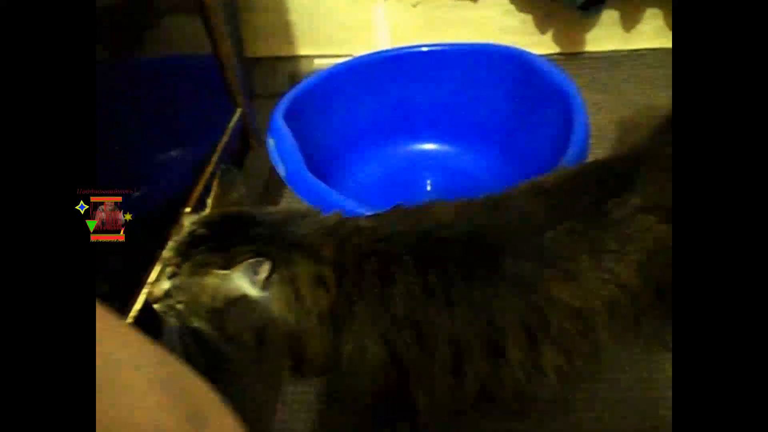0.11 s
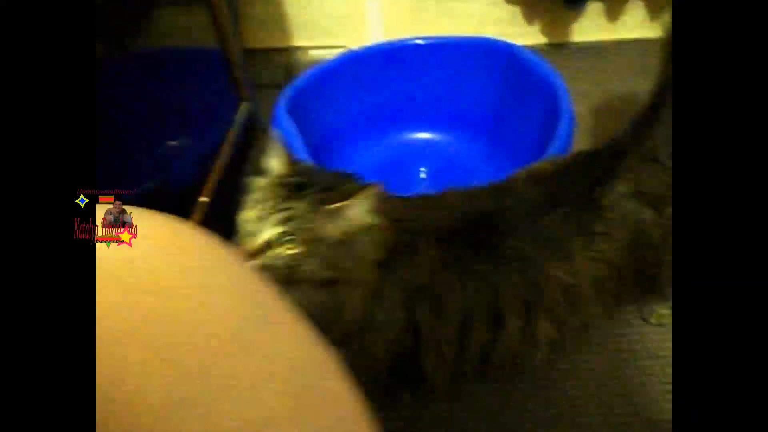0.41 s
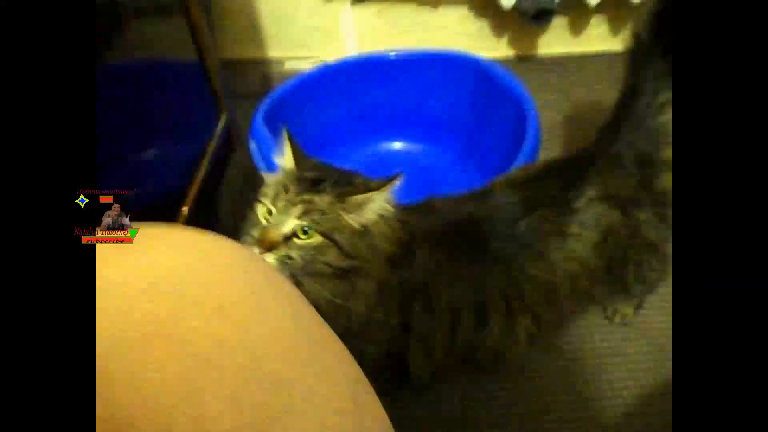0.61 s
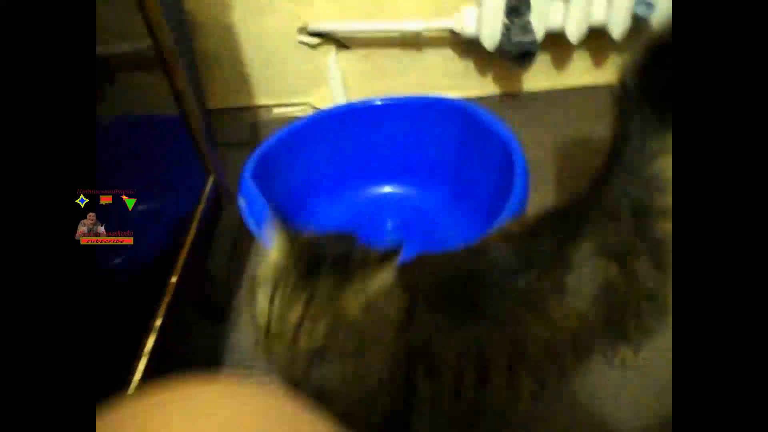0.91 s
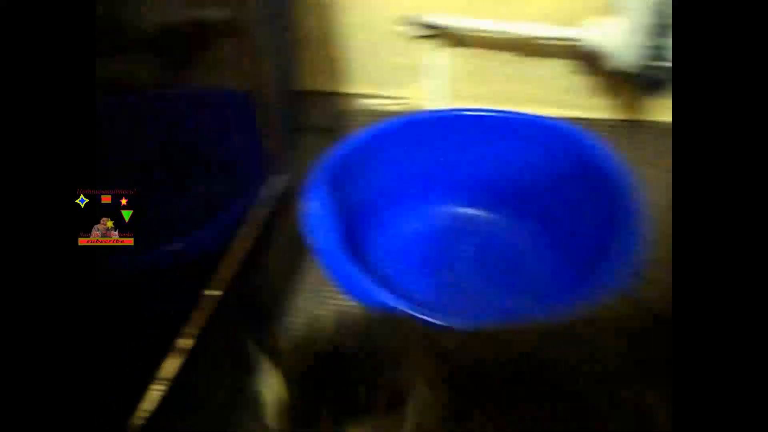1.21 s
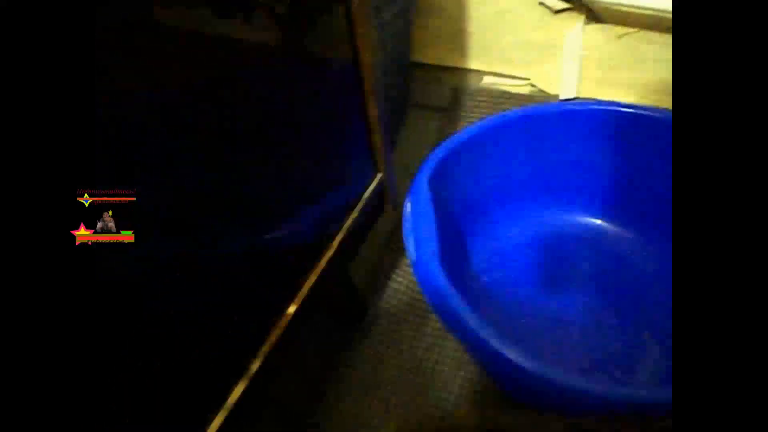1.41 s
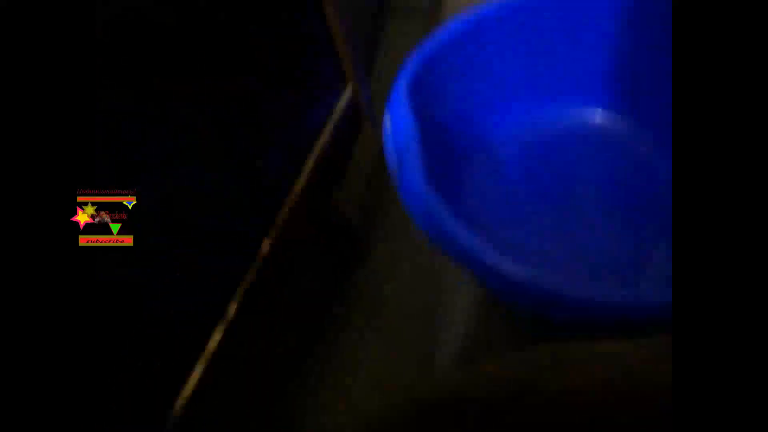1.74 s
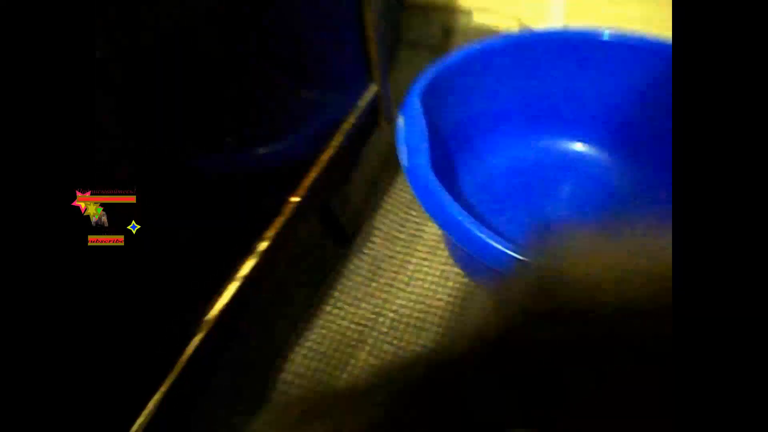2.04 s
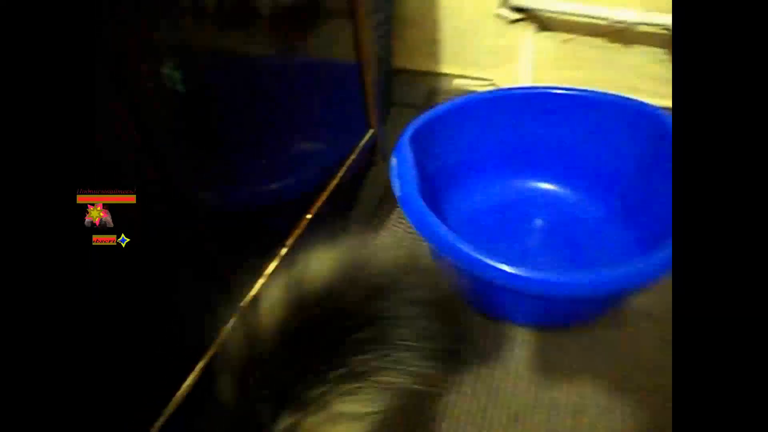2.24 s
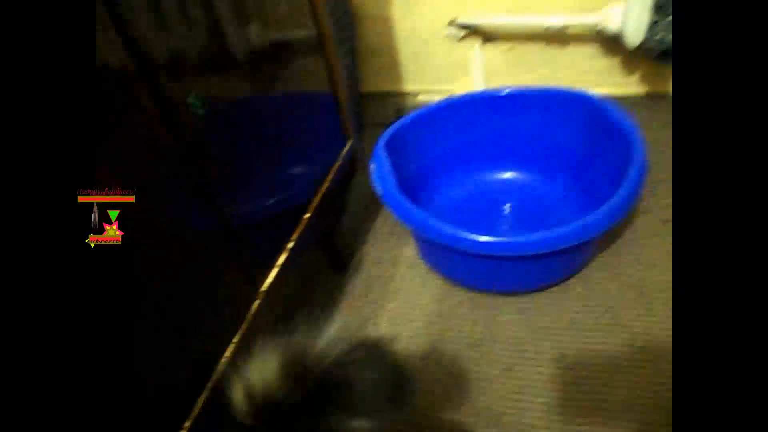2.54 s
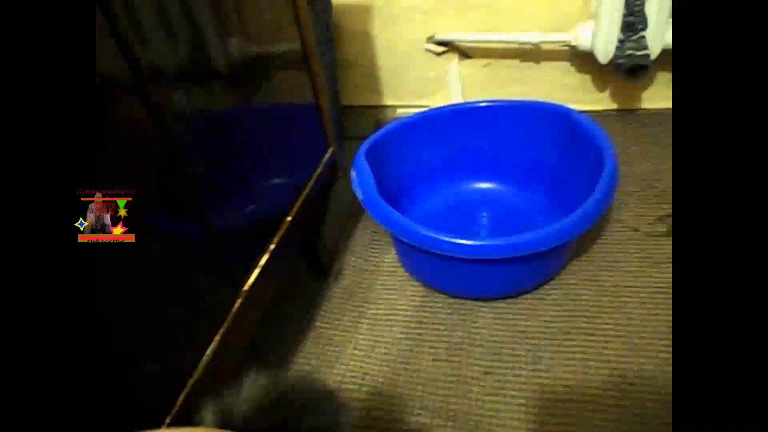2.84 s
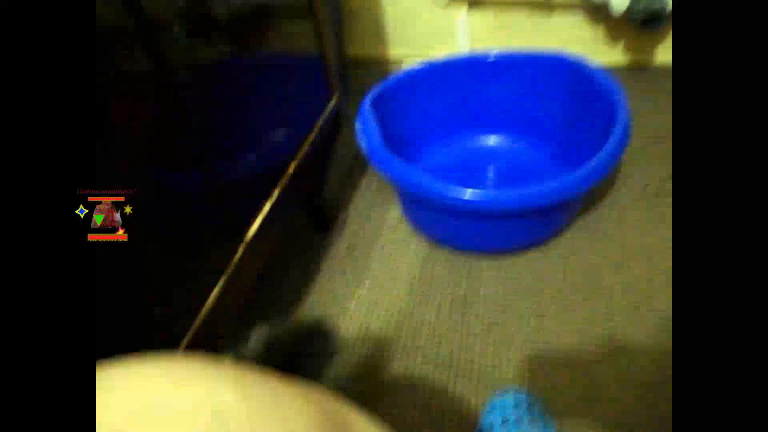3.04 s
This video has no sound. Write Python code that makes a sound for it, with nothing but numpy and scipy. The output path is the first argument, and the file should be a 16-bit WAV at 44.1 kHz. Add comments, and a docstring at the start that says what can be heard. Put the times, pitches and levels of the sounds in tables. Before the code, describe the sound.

Slippers scuff on carpet in a small quiet room; close plastic clicks and a creak come early, then dragging steps, a sharp slap around two seconds and a juddering drag, with handheld microphone rumble.

```python
"""Slippers on carpet, with a hand-held camera

Someone shuffles over carpet in a small room: friction noise from many fibre flicks makes the scuffs,
decaying noise and resonances the slaps, low modes the thuds, and stick-slip the groans and a judder.
Close to the microphone a plastic camera case creaks and clicks in decaying modes, and squeaks in
narrow resonances. Slow rumble from the hand, quiet room noise and a thin whine lie beneath.
"""
import sys
import numpy as np
from scipy import signal
from scipy.fft import rfft, irfft
from scipy.io import wavfile
from scipy.ndimage import uniform_filter1d

SR = 44100
rng = np.random.default_rng(int(sys.argv[2]) if len(sys.argv) > 2 else 0)


def transcribe(signal):
    """Save signal, clipped to [-1, 1], as a 16-bit WAV file at the path in sys.argv[1]."""
    frames = np.atleast_2d(signal).T
    limited = np.clip(frames, -1, 1)
    pcm = np.round(limited * 32767).astype(np.int16)
    wavfile.write(sys.argv[1], SR, pcm)


N = 141120
T = np.arange(N) / SR

# spectrum of bright friction, treble: frequency_hz, level_db
HISS_COLOUR = [(2500, -18), (4300, -12.5), (5000, -3.5), (6200, -0.5), (7100, 2.5), (7900, -2),
               (9000, -5.5), (10200, -6.5), (11500, -30.5)]
# spectrum of coarse friction, upper middle: frequency_hz, level_db
RASP_COLOUR = [(1200, -18), (1800, -1.5), (2150, -0.5), (2500, -2), (2900, 0), (3500, -1), (4100, -2.5),
               (4600, -4), (6000, -10)]
# spectrum of the fuller friction, lower middle: frequency_hz, level_db
BODY_COLOUR = [(250, 5), (400, -5), (560, 0.5), (900, -2), (1180, -1), (1500, -9), (2200, -14)]


def from_db(db):
    """Decibels are logarithmic: 20 dB is a factor of ten in amplitude."""
    return 10 ** (np.asarray(db) / 20)


def rms_one(x):
    """Root-mean-square normalisation: scale to unit rms."""
    return x / np.sqrt(np.mean(x ** 2) + 1e-20)


def level(rows):
    """Amplitude envelope: gain over time from (time_s, level_db) points, silent outside them."""
    return from_db(np.interp(T, *np.transpose(rows), left=-np.inf, right=-np.inf))


def coloured(x, points):
    """Spectral shaping through (frequency_hz, level_db) points, with falling skirts; rms 1."""
    hz, db = np.transpose(points)
    f = np.maximum(np.fft.rfftfreq(N, 1 / SR), 1)
    skirts = np.minimum(f / hz[0], 1) ** 2 * np.minimum(hz[-1] / f, 1) ** 2
    colour = from_db(np.interp(np.log(f), np.log(hz), db))
    return rms_one(irfft(rfft(x) * skirts * colour, N))


def noise(points):
    """Coloured noise: Gaussian noise with a chosen spectrum."""
    return coloured(rng.standard_normal(N), points)


def slow_noise(cutoff_hz):
    """Low-pass noise: a random wander slower than the cutoff; rms 1."""
    low_pass = signal.butter(2, cutoff_hz, fs=SR, output="sos")
    return rms_one(signal.sosfilt(low_pass, rng.standard_normal(N)))


def steadied(x, span_s):
    """Amplitude levelling: divide by the running rms to even out the chance swells of a noise."""
    running_power = uniform_filter1d(x ** 2, max(int(span_s * SR), 2))
    return x / np.sqrt(running_power + 0.0011)


def blow(start, rise, decay):
    """Impact envelope: a quick linear rise and an exponential fall."""
    age = np.maximum(T - start, 0)
    fall = np.exp(-np.minimum(np.maximum(age - rise, 0) / decay, 50))
    return np.minimum(age / rise, 1) * fall


def ring(age, hz, t60):
    """Damped free vibration: a struck mode falls 60 dB in t60 seconds."""
    return np.sin(2 * np.pi * hz * age) * np.exp(-np.log(1000) * age / t60)


def resonant(rings):
    """Forced resonance: noise excites narrow (centre_hz, width_hz, level_db) resonances."""
    rub = rng.standard_normal(N)
    tones = 0
    for hz, width, db in rings:
        peak = signal.iirpeak(hz, hz / width, fs=SR)
        tones = tones + from_db(db) * rms_one(signal.lfilter(*peak, rub))
    return steadied(rms_one(tones), 0.06)


def background():
    """Stationary sound: coloured room noise and the pure tones of the camera's electronics."""
    # quiet room noise: frequency_hz, level_db
    floor_colour = [(40, 0.5), (100, -0.5), (200, -5), (400, -6), (1000, -15), (2000, -17.5), (4000, -18),
                    (7200, -16), (10300, -23.5), (11500, -30)]
    # thin electronic whine: frequency_hz, level_db
    whine_tones = [(10714, -72), (10796, -83), (11254, -84), (11336, -96.5)]
    floor_db = -55
    whine = sum(from_db(db) * rms_one(np.sin(2 * np.pi * hz * T)) for hz, db in whine_tones)
    return from_db(floor_db) * noise(floor_colour) + whine


def handling():
    """Low-frequency motion: rumble as the camera sways, and bumps as damped slow swings."""
    # the camera sways in the hand: time_s, level_db
    sway_level = [(0, -52), (.25, -44), (.5, -48.5), (.85, -47), (1.02, -51), (1.13, -36.5), (1.3, -38.5),
                  (1.5, -32), (1.8, -39), (1.94, -44.5), (2.04, -45.5), (2.12, -31), (2.22, -44),
                  (2.65, -55), (2.9, -44.5), (3.2, -46)]
    # spectrum of the rumble: frequency_hz, level_db
    rumble_colour = [(10, 1), (18, -3), (30, -9), (50, -14), (80, -22.5), (160, -37)]
    # the hand bumps the camera: start_s, level_db, pitch_hz, decay_s
    bump_rows = [(.303, -21.5, 28.2, 0.014), (0.392, -25.5, 23.5, 0.048), (.596, -30.5, 36, 0.036)]
    bumps = 0
    for start, db, hz, decay in bump_rows:
        swing = np.sin(2 * np.pi * hz * (T - start))
        bumps = bumps + from_db(db) * blow(start, 0.0028, decay) * swing
    sway = from_db(np.interp(T, *np.transpose(sway_level)))
    return bumps + sway * steadied(noise(rumble_colour), 0.073)


def squeak():
    """Frictional excitation: a finger rubs narrow resonances, and the pitch sags as the rub slows."""
    # loudness of the rub: time_s, level_db
    squeak_level = [(1.026, -83), (1.05, -38), (1.072, -39), (1.083, -45.5), (1.145, -43), (1.17, -55.5),
                    (1.195, -48), (1.215, -72)]
    # resonances at the middle of the rub: centre_hz, width_hz, level_db
    squeak_rings = [(1199, 28, -5), (1007, 20, -8), (1420, 230, -15)]
    fall_per_s = 0.24  # share of the middle pitch lost each second
    middle = (squeak_level[0][0] + squeak_level[-1][0]) / 2
    # reading the tone along a slowing clock lowers its pitch
    sagging = T - fall_per_s * (T - middle) ** 2 / 2
    tone = np.interp(sagging, T, resonant(squeak_rings))
    return level(squeak_level) * steadied(tone, 0.0113)


def snap(start, rings, t60, case_db, cut_hz):
    """Impulsive release: a slip cracks, rings its own part (pitch_hz, level_db) and the case modes."""
    # modes of the case, before a small random spread in level: pitch_hz, level_db, t60_s
    case_modes = [(947, -12.5, 0.031), (1190, -17.5, 0.022), (2000, -19, .012), (2690, -3, 0.0097),
                  (3720, -33, 0.0045), (4780, -2, 0.0042), (5650, -2, .007), (7100, -8, 0.0077),
                  (7820, -12.5, 0.013), (9840, -9, 0.0029), (10200, -40, 0.014)]
    ring_db, crack_db, crack_decay_s = 1, -4, 0.00067
    age = np.arange(SR // 20) / SR
    case = 0
    for k, (hz, db, mode_t60) in enumerate(case_modes):
        gain = (-1) ** k * from_db(db + rng.normal(0, 1))
        case = case + gain * ring(age, hz, mode_t60)
    crack = from_db(crack_db) * rng.standard_normal(len(age)) * np.exp(-age / crack_decay_s)
    high_pass = signal.butter(1, min(cut_hz, SR / 3), "high", fs=SR, output="sos")
    shell = signal.sosfilt(high_pass, case + crack)
    part = sum(from_db(ring_db + db) * ring(age, hz, t60) for hz, db in rings)
    out = np.zeros(N)
    first = int(start * SR)
    out[first:first + len(age)] = from_db(case_db) * shell + part
    return out


def camera_case():
    """Stick-slip and modal ringing: the grip makes the case creak, ending in a knock, then click."""
    # quick run of slips in the creak: start_s, level_db
    creak_slips = [(.2952, -26.5), (.2967, -18), (.2984, -16), (.3001, -9)]
    # single clicks: start_s, level_db, ring_hz, ring_t60_s, second_ring_hz, second_ring_db (relative),
    # case_db (relative), low_cut_hz
    click_rows = [(0.5035, -8.5, 2710, 0.01, 5190, -15, -4, 600),
                  (0.557, -18.5, 7800, 0.0059, 9900, 1, -4.5, 4000),
                  (.5963, -10.5, 4970, 0.008, 2850, -13, -9, 1980),
                  (0.6141, -15.5, 7100, 0.007, 3400, -5.5, 0, 3000),
                  (1.1106, -22, 6670, 0.0066, 7400, -2.5, -7, 6140)]
    creak_hz, creak_t60_s, creak_case_db = 3570, 0.0088, -1
    knock_db, knock_hz, knock_t60_s = -28, 637, 0.045
    creak = 0
    for start, db in creak_slips:
        slip = snap(start, [(creak_hz, 0)], creak_t60_s, creak_case_db, cut_hz=890)
        creak = creak + from_db(db) * slip
    knock_age = np.maximum(T - creak_slips[-1][0], 0)
    knock = from_db(knock_db) * ring(knock_age, knock_hz, knock_t60_s)
    clicks = 0
    for start, db, hz, t60, second_hz, second_db, case_db, cut_hz in click_rows:
        click = snap(start, [(hz, 0), (second_hz, second_db)], t60, case_db, cut_hz)
        clicks = clicks + from_db(db) * click
    return creak + knock + clicks


def drag_and_chirp():
    """Forced resonance: the drag rings in narrow bands; once the sole squeaks with falling pitch."""
    # faint rough squeak of the sole: time_s, level_db, pitch_hz
    chirp_path = [(2.125, -64, 3140), (2.137, -56, 3000), (2.158, -50, 2590), (2.172, -50, 2160),
                  (2.185, -54, 1950), (2.20, -66, 1920)]
    # loudness of the ringing during the drag: time_s, level_db
    drag_level = [(2.43, -76), (2.443, -44), (2.48, -42.5), (2.56, -44.5), (2.66, -51), (2.70, -47),
                  (2.78, -49), (2.915, -49), (2.935, -61)]
    # low resonances, and a bright one of the microphone opening near 7 kHz (two rows):
    # centre_hz, width_hz, level_db
    drag_rings = [(307, 37, -3), (572, 13, -4), (1200, 63, -2.5), (6920, 260, -3), (7100, 240, -1.5)]
    time_s, db, hz = np.transpose(chirp_path)
    carrier = np.sin(2 * np.pi * np.cumsum(np.interp(T, time_s, hz)) / SR)
    chirp = rms_one(slow_noise(120) * carrier)  # random amplitude roughens the tone
    return level(drag_level) * resonant(drag_rings) + level(np.c_[time_s, db]) * chirp


def groans(count=4):
    """Stick-slip oscillation: short, unsteady harmonic tones that sink as the foot slows."""
    # a sole grips and slides: start_s, length_s, level_db, first_pitch_hz, last_pitch_hz
    groan_rows = [(.665, 0.076, -45, 240, 164), (1.362, 0.12, -34.5, 112, 102),
                  (2.455, 0.123, -36, 178, 127.2)]
    jitter, jitter_hz = 0.049, 50  # rms share of the pitch; cutoff of its wander
    step_db = -10.5  # from each harmonic to the next
    out = np.zeros(N)
    for start, length, db, first_hz, last_hz in groan_rows:
        along = np.clip((T - start) / length, 0, 1)
        glide_hz = first_hz + (last_hz - first_hz) * along
        phase = 2 * np.pi * np.cumsum(glide_hz * (1 + jitter * slow_noise(jitter_hz))) / SR
        tone = sum(from_db(db + step_db * k) * np.sin((k + 1) * phase) for k in range(count))
        out += np.sin(np.pi * along) * tone
    return out


def thuds():
    """Low-mode impact: weight makes the floor boom under the carpet, one mode in a dull puff."""
    # weight comes down: start_s, level_db, pitch_hz, decay_s, boom_db (relative to the puff)
    thud_rows = [(.851, -31.5, 199, 0.022, -8), (1.365, -37.5, 106.7, .03, 2.5),
                 (1.396, -37.5, 108, 0.058, 6), (1.444, -34.5, 230, 0.028, -3.5),
                 (1.51, -37, 101, 0.026, 8), (1.602, -45.5, 108.5, 0.025, 7.5),
                 (1.664, -39.5, 106, 0.029, 7), (1.738, -44.5, 97, 0.027, 7.5),
                 (1.795, -41.5, 84.7, .04, 8), (2.052, -30, 103.7, 0.027, -5), (2.277, -37, 90, 0.017, 4)]
    # spectrum of the puff: multiple of the pitch (no unit), level_db
    thud_colour = [(.3, 9), (.7, 0), (1.2, 1.5), (2, -4.5), (4, -14), (9, -24.5)]
    rise_s = 0.013
    out = np.zeros(N)
    for start, db, hz, decay, boom_db in thud_rows:
        puff = steadied(noise([(hz * k, colour_db) for k, colour_db in thud_colour]), 0.0167)
        boom = from_db(boom_db) * np.sin(2 * np.pi * hz * (T - start))
        out += from_db(db) * blow(start, rise_s, decay) * (puff + boom)
    return out


def judder(count=7):
    """Periodic stick-slip: the drag ends in regular slips, each with a bright catch; the last is late."""
    start_s, period_s, last_late_s, catch_delay_s = 2.7615, .0226, .006, .0062
    slip_db, catch_db, rasp_db = -36.5, -36, -44
    slip_decay_s, catch_decay_s = 0.0044, 0.0026
    starts = start_s + period_s * np.arange(count)
    starts[-1] += last_late_s
    slips = sum(blow(s, 0.00033, slip_decay_s) for s in starts)
    catches = sum(blow(s + catch_delay_s, 0.001, catch_decay_s) for s in starts)
    slip_sound = from_db(slip_db) * slips * steadied(noise(BODY_COLOUR), 0.0063)
    catch_sound = from_db(catch_db) * catches * noise(HISS_COLOUR)
    rasp_sound = from_db(rasp_db) * (slips + catches) * noise(RASP_COLOUR)
    return slip_sound + catch_sound + rasp_sound


def slaps():
    """Broadband impact: short bright smacks of noise and resonance, with a tail from the room."""
    # slipper slaps and taps: start_s, level_db, decay_s, body_db (relative), rasp_db (relative)
    slap_rows = [(0.01, -48.5, .003, -3, -2), (.036, -40, 0.0064, -9, -1), (0.041, -41, 0.0044, -4, -10),
                 (0.209, -36.5, 0.011, 1.5, -9), (0.391, -45, 0.0036, 7.5, 12.5),
                 (.605, -35.5, 0.0055, -11, -3.5), (1.342, -39.5, 0.0072, 2.5, -3),
                 (1.363, -57.5, 0.0073, 17, 0), (1.4421, -31.5, 0.0043, 0, -4),
                 (2.052, -17.5, 0.005, -14, -5), (2.273, -41.5, 0.018, 0, -1.5)]
    # resonances that form the rasp: centre_hz, width_hz, level_db
    slap_rings = [(1380, 73, -12), (1950, 380, 2.5), (2850, 250, 6.5), (3400, 390, -1), (3880, 50, -5),
                  (4780, 120, -10)]
    # spectrum of the hiss: frequency_hz, level_db
    slap_colour = [(2500, -25), (4300, -1.5), (5600, -3.5), (6400, 1), (7300, 1.5), (8100, -3.5),
                   (9000, -3.5), (10000, -3), (11500, -31.5)]
    attack_s, tail_db, tail_decay_s = 0.0012, -22.5, 0.031
    hiss = noise(slap_colour)
    body = steadied(noise(BODY_COLOUR), 0.0077)
    rasp = steadied(resonant(slap_rings), 0.015)
    out = np.zeros(N)
    for start, db, decay, body_db, rasp_db in slap_rows:
        tail = from_db(tail_db) * blow(start, 0.0022, tail_decay_s)
        shape = np.hypot(blow(start, attack_s, decay), tail)  # powers add
        out += from_db(db) * shape * (hiss + from_db(body_db) * body + from_db(rasp_db) * rasp)
    return out


def friction(colour):
    """Shot noise: countless fibres flick free at random, with uneven strength."""
    fibres_per_s, spread_db = 9000, 3
    flicks = (rng.random(N) < fibres_per_s / SR) * rng.choice([-1, 1], N)
    strength = from_db(spread_db * np.minimum(rng.exponential(1, N), 5))
    return coloured(flicks * strength, colour)


def scuffs():
    """Modulated friction: strokes swell, fade and let go; an irregular flutter roughens the loudness."""
    # a sole or cloth brushes along: start_s, length_s, swell_s, fade_db,
    # hiss_db, body_db, bass_db, rasp_db
    scuff_rows = [(0.237, 0.32, 0.038, 6, -58.5, -53.5, -57, -57.5),
                  (0.576, 0.081, .015, 4.5, -44, -42.5, -49, -50),
                  (0.66, 0.043, 0.035, 0, -47.5, -57, -43, -55.5),
                  (0.796, .13, 0.064, 4, -48.5, -50.5, -49.5, -51),
                  (0.917, 0.024, 0.016, 0.5, -47, -67, -72, -47.5),
                  (0.98, .15, 0.058, -2.5, -48.5, -54, -54, -51.5),
                  (1.147, 0.053, 0.0077, -2.5, -59.5, -51.5, -47.5, -65),
                  (1.214, 0.02, 0.0036, 2, -50, -45, -41.5, -44.5),
                  (1.239, 0.23, 0.085, 3.5, -52, -56, -47, -55.5),
                  (1.464, 0.099, .022, 5, -43, -46.5, -48, -50.5),
                  (1.539, 0.34, 0.091, 7, -44.5, -43.5, -47.5, -48),
                  (1.97, 0.1, .025, 4, -54.5, -63, -50.5, -61),
                  (2.133, 0.082, 0.015, 6, -46.5, -42.5, -42.5, -49.5),
                  (2.296, 0.051, 0.022, 0, -37.5, -40.5, -46.5, -39),
                  (2.436, 0.011, 0.0027, 1, -42, -47.5, -45, -48.5),
                  (2.443, .19, 0.09, 3.5, -40.5, -43, -41, -45.5),
                  (2.616, 0.065, 0.011, -3.5, -50.5, -64, -81, -60.5),
                  (2.684, 0.068, 0.0082, 1.5, -42.5, -46.5, -48.5, -49),
                  (2.753, .16, .02, 2.5, -59.5, -48.5, -45.5, -71),
                  (2.93, 0.094, 0.013, 6.5, -84, -56, -57, -70),
                  (3.062, 0.08, .035, 11, -54.5, -56, -68, -59.5)]
    # spectrum of the deep friction: frequency_hz, level_db
    bass_colour = [(50, -3), (95, -2), (160, 0), (220, -1.5), (310, -2), (420, -6), (700, -18)]
    release_s, swell_power = 0.015, 0.9
    flutter_hz, flutter_db = 90, 1  # cutoff and rms depth of the flutter
    bass = steadied(friction(bass_colour), 0.052)
    parts = np.array([friction(HISS_COLOUR), friction(BODY_COLOUR), bass, friction(RASP_COLOUR)])
    out = np.zeros(N)
    for start, length, swell, fade_db, *part_db in scuff_rows:
        age = np.maximum(T - start, 0)
        rise = np.minimum(age / swell, 1) ** swell_power
        fade = from_db(-fade_db * np.clip((age - swell) / max(length - swell, 1e-3), 0, 1))
        release = np.exp(-np.maximum(age - length, 0) / release_s)
        out += rise * fade * release * (from_db(part_db) @ parts)
    return out * rms_one(from_db(flutter_db * slow_noise(flutter_hz)))


def room(x):
    """Early reflection: delayed copies from near surfaces interfere and colour the sound."""
    # reflections from floor, cupboard and walls: delay_s, level_db
    echo_rows = [(.00095, -26), (.0034, -23.5), (.0059, -19), (.0093, -19), (0.0139, -17.5), (0.02, -16.5)]
    return x + sum(from_db(db) * np.pad(x, (int(delay * SR), 0))[:N] for delay, db in echo_rows)


def scene():
    """Superposition: the quiet room, the camera in the hand and the feet add linearly."""
    hand = camera_case() + squeak() + handling()
    feet = room(scuffs() + slaps() + judder()) + thuds() + groans() + drag_and_chirp()
    return (feet + hand + background())[None]


def record(dry):
    """Band limiting: a steep elliptic low-pass in the recorder removes the top treble."""
    cutoff_hz = 11700
    return signal.sosfilt(signal.ellip(10, .3, 80, cutoff_hz, fs=SR, output="sos"), dry)


dry = scene()
out = record(dry)
transcribe(out)
```